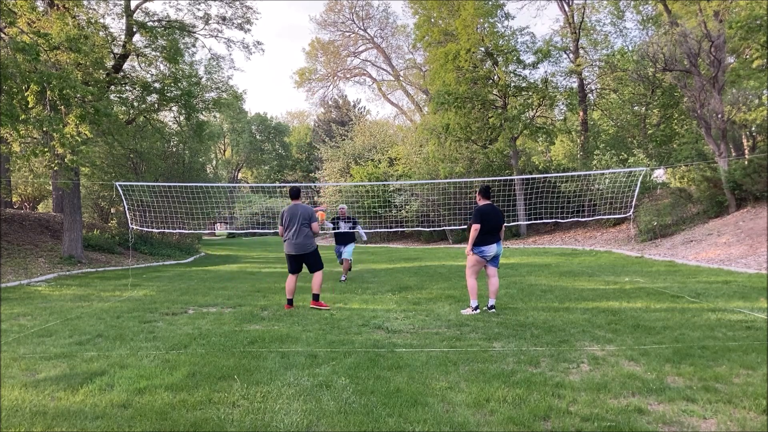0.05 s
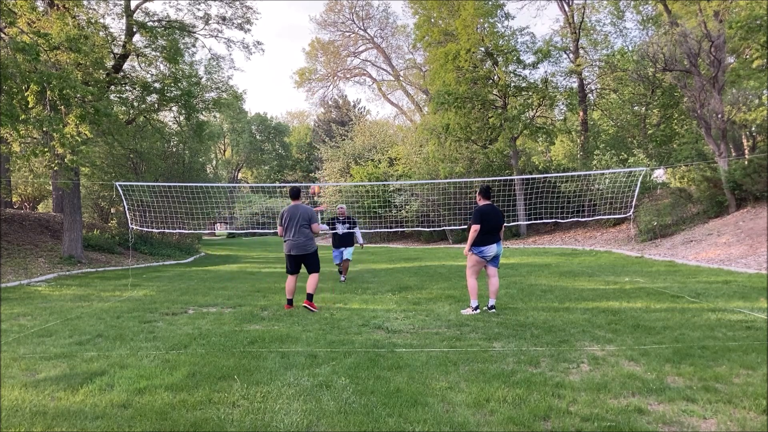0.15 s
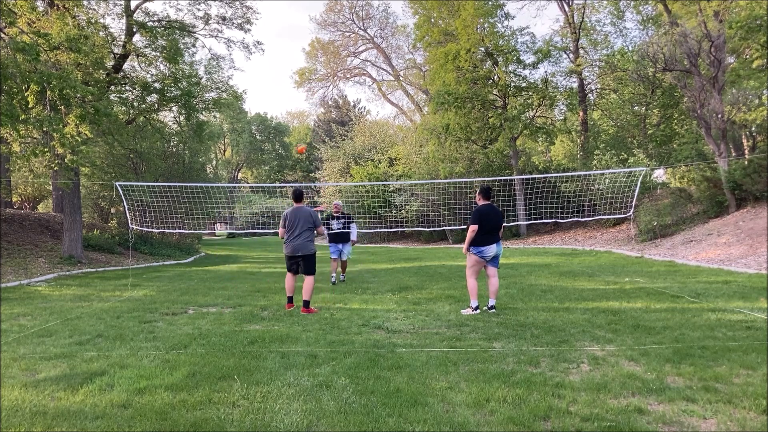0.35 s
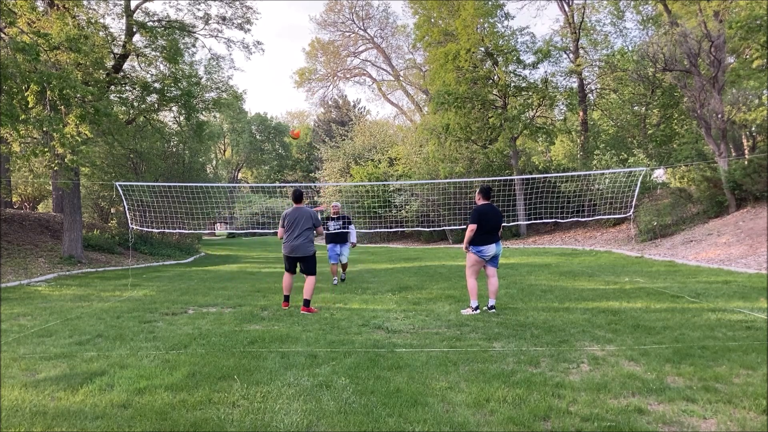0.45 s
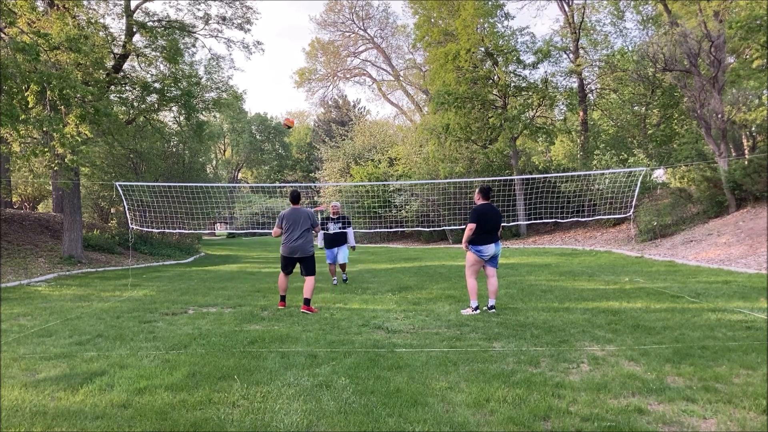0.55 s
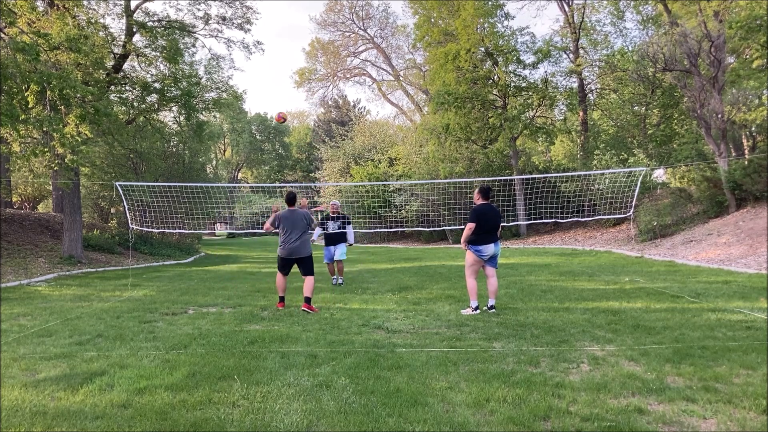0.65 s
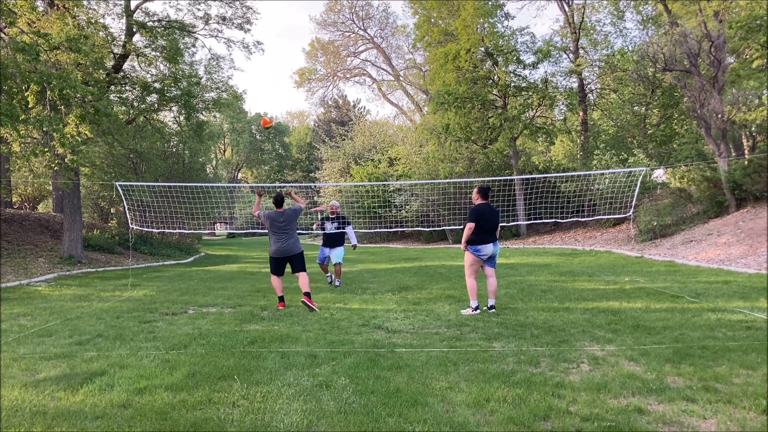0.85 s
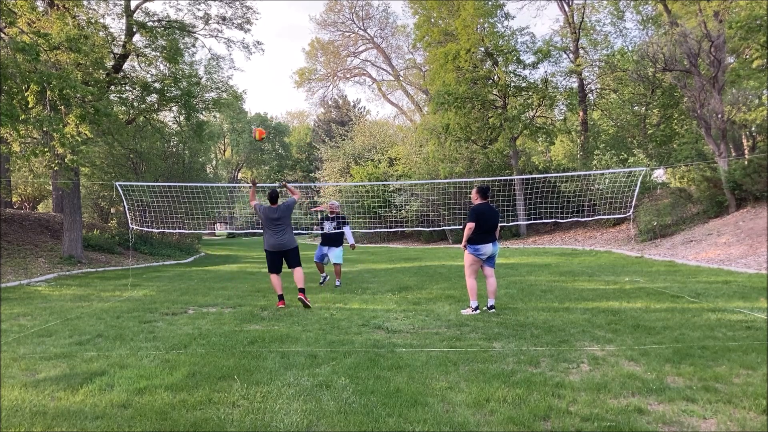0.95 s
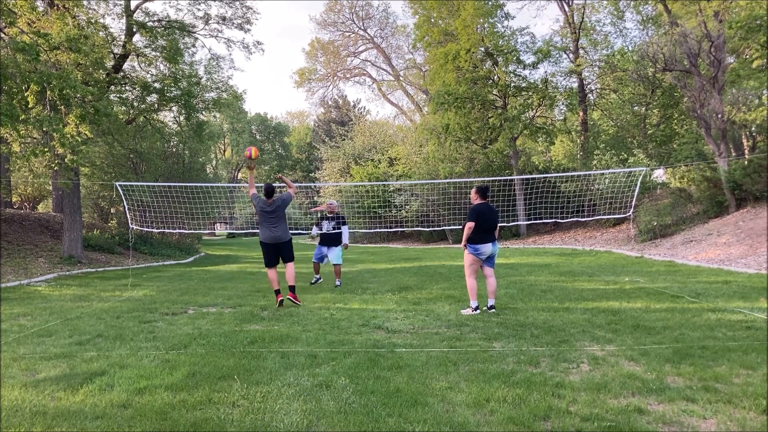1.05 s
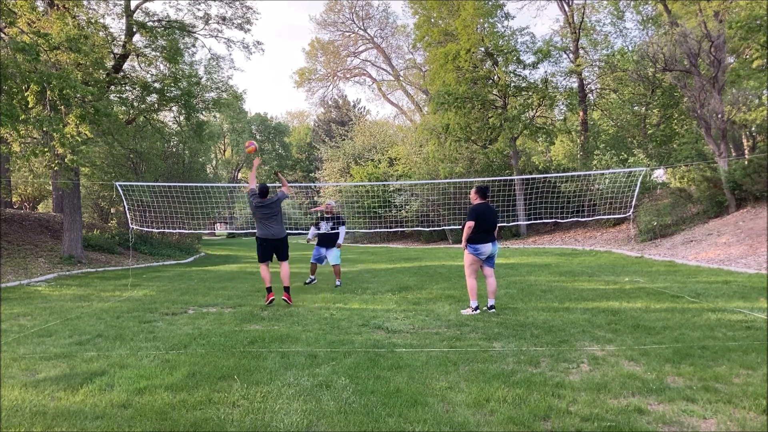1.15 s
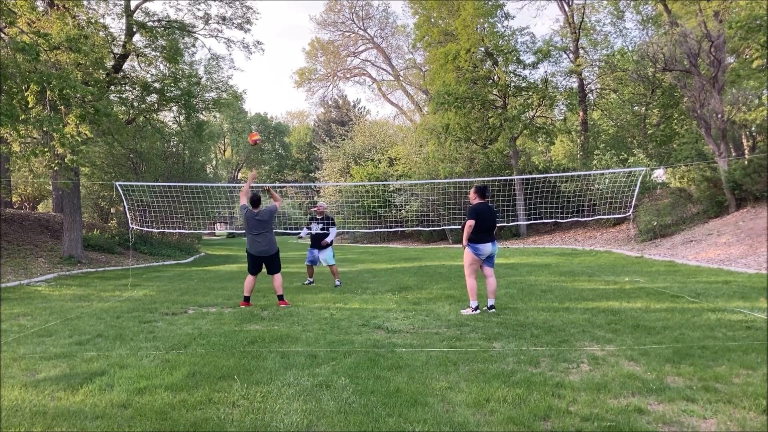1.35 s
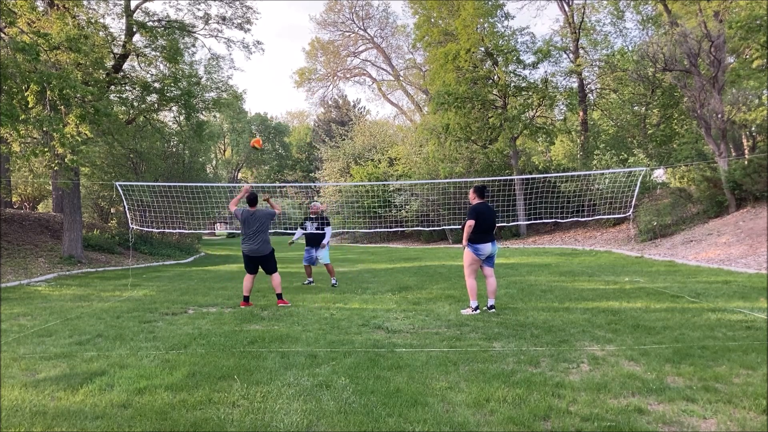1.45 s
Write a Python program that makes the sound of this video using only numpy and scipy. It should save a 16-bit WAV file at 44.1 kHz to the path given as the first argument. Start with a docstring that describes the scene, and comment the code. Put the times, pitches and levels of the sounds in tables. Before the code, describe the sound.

Two volleyball hits on an open lawn, picked up in stereo from a few metres back: a loud cracking smack with woody outdoor echo, then a duller, quieter double-handed tap, and barely audible steps on grass.

```python
"""Faint hiss over far traffic rumble, then two volleyball blows on a lawn ringed by trees and an earth bank.
Each blow: quick skin contacts (noise cracks, resonators ringing) and a deep thump of falling pitch.
Echoes follow: scatter from the trees (band noise), a noise swell from the bank, dulled thump copies.
Two soft footfalls (noise puffs) come last."""
import sys
import numpy as np
from scipy import signal
from scipy.fft import rfft, irfft
from scipy.io import wavfile

SR = 44100
rng = np.random.default_rng(int(sys.argv[2]) if len(sys.argv) > 2 else 0)


def voltage_ratio(level):
    """Linear amplitude factor for a level in decibels (scalar or array-like)."""
    return 10 ** (np.asarray(level, float) / 20)


def waveform_to_disk(signal):
    """Save audio, clipped to [-1, 1], as 16-bit WAV at the path in sys.argv[1]."""
    frames = np.transpose(np.atleast_2d(signal))
    scaled = np.clip(frames, -1, 1) * 32767
    samples = np.round(scaled).astype(np.int16)
    wavfile.write(sys.argv[1], SR, samples)


N = 66150  # 1.5 s

# Spectrum levels are relative: the noise is scaled to rms near 1 before its own level applies.
# background air: [f/Hz, level/dB per Hz]
AIR_SPECTRUM = [(20, -50.5), (41, -9), (65, 0), (125, -10.5), (250, -27.5), (700, -28.5), (1200, -37),
                (3000, -45.5), (8000, -50), (12000, -49), (14500, -60), (17000, -65.5)]
# background air: [f/Hz, left-right likeness -1..1]
AIR_LIKENESS = [(60, 0.95), (180, 0.36), (550, -0.23), (1650, -0.048), (4970, -0.72), (15000, 0.73)]
AIR_LEVEL_DB, AIR_DRIFT_DB = -57.5, 0.6

# blows: [t/s, thump level/dB, thump turns, bank echo delay/s, bank echo peak/dB]
BLOWS = [(.205, -13.5, 1.67, 0.024, -43), (1.2205, -21, 1.3, 0.027, -53)]
# skin contacts, one list per blow: [t/s, crack level/dB, ring drive/dB]
CONTACTS = [
    [(.2053, -57, -64), (.2060, -9.5, -20), (.2067, -57, -10.5), (.2085, -21, -75), (.2094, -31, -25)],
    [(1.2196, -30, -30.5), (1.2203, -24, -35.5), (1.2214, -35.5, -25.5), (1.2223, -56.5, -24.5),
     (1.2255, -55.5, -34), (1.2272, -54.5, -32.5), (1.2305, -58.5, -34.5)],
]
# crack colour, one list per blow: [f/Hz, level/dB per Hz]
CRACK_SPECTRA = [
    [(300, -16.5), (1500, -10.5), (3000, -3.5), (5100, 2), (6500, -2), (9000, -1.5), (11500, -2.5),
     (13600, -6.5), (15500, -3), (17500, -25)],
    [(300, -12), (1500, 16), (3000, -41), (5000, -48), (7200, 0.5), (9000, 8.5), (11500, 3.5), (13600, -19),
     (15500, -3), (17500, -30)],
]
CRACK_T60_S = 0.0041
# ball shell modes: [f/Hz, t60/s, level in first blow/dB, level in second blow/dB]
SHELL_MODES = [(1197, 0.012, -4.5, -6.5), (918, .008, -0.5, -8), (1810, .007, -19, -6.5),
               (2410, .007, -12.5, -11), (630, 0.0092, -29.5, -5), (428, 0.017, -27, 1)]
# ring band per blow, hard fist then soft fingers: [low cut/Hz, high cut/Hz]
RING_BANDS_HZ = [(635, 3500), (294.7, 2600)]
# thump times count from the blow; spread is in ln(time)
THUMP_CREST_S, THUMP_PEAK_S, THUMP_SPREAD_LN = 0.0156, 0.012, 0.5
# left-right balance of a blow: [f/Hz, left minus right/dB]
BLOW_BALANCE = [(40, -2), (150, -3.45), (400, 1.5), (1200, 4), (2500, 1), (16000, 0.5)]
# phase lead of the left channel for a blow: [f/Hz, lead/rad]
LEFT_LEAD = [(1900, 0), (2400, .5), (3100, 1.6), (5700, 1.7), (8350, -2.3), (9560, -3.7), (11500, -5.6),
             (13300, -9.1), (16700, -12.3)]

# tree scatter, one list per blow: [f/Hz, level/dB per Hz]
TREE_SPECTRA = [
    [(40, -17.5), (110, -1.5), (250, -21), (450, -25), (1000, -17), (2900, -26.5), (7400, -26),
     (11000, -26.5), (15500, -42.5), (17000, -53.5)],
    [(40, -18), (110, 0.5), (250, -11.5), (480, -14), (900, -13.5), (1600, -19.5), (3500, -26),
     (4400, -32.5), (8000, -34), (11900, -30), (15800, -68), (17000, -55)],
]
# tree scatter level per blow: [level/dB]
TREE_LEVELS_DB = [-43.5, -51.5]
# tree scatter decay before the per-blow factor: [f/Hz, t60/s]
TREE_T60 = [(60, .6), (120, 0.93), (300, 0.28), (1000, 0.85), (2000, 0.61), (3500, .65), (6000, .45),
            (8000, .33), (11000, 0.31), (16000, 0.22)]
# factor on the tree t60 per blow: [factor]
TREE_T60_FACTORS = [1.036, 0.71]
# tree scatter: [f/Hz, left-right likeness -1..1]
TREE_LIKENESS = [(60, 0.83), (180, 0.91), (550, 0.12), (1650, -0.28), (4970, 0.39), (15000, -0.25)]
# swell added by the far tree line, per blow: [t after blow/s, width/s, gain/dB]
FAR_TREES = [(.19, 0.13, 0.5), (.2, 0.042, 5.5)]
TREE_RISE_S, TREE_DRIFT_DB = 0.012, 0.7

# bank echo colour: [f/Hz, level/dB per Hz]
BANK_SPECTRUM = [(250, -16.5), (450, -6), (1000, -2.5), (2000, -7.5), (3500, 2), (4600, -2), (6000, -9),
                 (8000, -10), (12000, -17), (16000, -24.5)]
# time from echo onset to its peak, per blow: [t/s]
BANK_RISE_S = [0.0036, 0.0071]
# thump returns from banks and trunks, one list per blow: [t after blow/s, level re thump/dB]
THUMP_RETURNS = [
    [(.026, -16), (.108, -26), (.15, -28.5)],
    [(.03, -16), (.068, -22.5)],
]
RETURN_CUT_HZ = 160

# soft footfalls on grass: [t/s, level/dB, length/s]
STEPS = [(1.413, -66.5, 0.017), (1.454, -62.5, 0.039)]
# footfall colour: [f/Hz, level/dB per Hz]
STEP_SPECTRUM = [(80, 5), (300, 17.5), (900, 9.5), (2500, -21), (8000, -26.5), (12000, -40), (14000, -40)]

# fixed treble notches over the whole sound: [f/Hz, width/Hz, gain/dB]
TREBLE_DIPS = [(9230, 1700, -21), (13700, 760, -25)]
LOW_CUT_HZ, HIGH_STOP_HZ = 51, 17100


def rms_one(x):
    """Scale to rms 1."""
    return x / np.sqrt(np.mean(x ** 2) + 1e-20)


def at_hz(points, hz):
    """Read a table on a log-frequency axis."""
    p = np.array(points, float)
    return np.interp(np.log(hz), np.log(np.maximum(p[:, 0], 1)), p[:, 1])


def drift(rate_hz):
    """Slow random curve of rms near 1: low-passed noise, one point per 40 samples."""
    pole = np.exp(-2 * np.pi * rate_hz * 40 / SR)
    white = rng.standard_normal(N // 40 + 2002)
    slow = signal.lfilter([1], [1, -2 * pole, pole ** 2], white)[2000:]
    return np.interp(np.arange(N) / 40, np.arange(len(slow)), rms_one(slow))


def bands(spectrum, likeness, drift_db, shape):
    """Third-octave stereo noise bands, total rms near 1 before each is multiplied by shape(hz)."""
    edges = 22 * 2 ** np.arange(0, 9.8, 1 / 3)
    mids = np.sqrt(edges[1:] * edges[:-1])
    gains = voltage_ratio(at_hz(spectrum, mids))
    gains = gains / np.sqrt(np.sum(gains ** 2 * np.diff(edges)) * 2 / SR)
    white = rng.standard_normal((2, 2, N + 8000))
    common_drift = drift(1.7)
    out = 0
    for k, hz in enumerate(mids):
        sos = signal.butter(2, edges[k:k + 2], "band", fs=SR, output="sos")
        mid, side = signal.sosfilt(sos, white[k % 2])[:, 8000:]  # filter settled
        alike = np.clip(at_hz(likeness, hz), -1, 1)
        gain = gains[k] * shape(hz) * voltage_ratio(drift_db * (1.3 * common_drift + drift(9.5)))
        stereo = np.sqrt(1 + alike) * mid + np.sqrt(1 - alike) * side * [[1], [-1]]
        out = out + gain * stereo / np.sqrt(2)
    return out


def coloured(spectrum):
    """Mono noise of the given spectrum, rms 1; 12 dB/octave fall below the first point."""
    hz = np.maximum(np.arange(N // 2 + 1) * SR / N, 1)
    low_fall = np.minimum(hz / spectrum[0][0], 1) ** 2
    white = rfft(rng.standard_normal(N))
    return rms_one(irfft(white * voltage_ratio(at_hz(spectrum, hz)) * low_fall, N))


def air():
    """Far traffic rumble and faint hiss: steady noise whose bands drift in level."""
    return voltage_ratio(AIR_LEVEL_DB) * bands(AIR_SPECTRUM, AIR_LIKENESS, AIR_DRIFT_DB, lambda hz: 1)


def slap(k):
    """Each skin contact fires a decaying noise crack and drives the shell's damped modes."""
    crack_hits, ring_hits = np.zeros(N) + 1e-18, np.zeros(N) + 1e-18
    for s, crack_db, ring_db in CONTACTS[k]:
        crack_hits[int(s * SR)] = voltage_ratio(crack_db)
        ring_hits[int(s * SR)] = -voltage_ratio(ring_db)
    crack_envelope = signal.lfilter([1], [1, -voltage_ratio(-60 / (CRACK_T60_S * SR))], crack_hits)
    crack = coloured(CRACK_SPECTRA[k]) * crack_envelope
    ring = 0
    for hz, t60_s, *levels_db in SHELL_MODES:
        r, w = voltage_ratio(-60 / (t60_s * SR)), 2 * np.pi * hz / SR
        drive = [0, voltage_ratio(levels_db[k]) * np.sin(w)]
        ring = ring + signal.lfilter(drive, [1, -2 * r * np.cos(w), r * r], ring_hits)
    band = signal.butter(2, RING_BANDS_HZ[k], "band", fs=SR, output="sos")
    return crack + signal.sosfilt(band, ring)


def thump(s, level_db, turns):
    """Deep thump: a swell of falling pitch, turns / time since the blow."""
    log_t = np.log(np.maximum(np.arange(N) / SR - s, 1e-5))
    swell = np.exp(-.5 * ((log_t - np.log(THUMP_PEAK_S)) / THUMP_SPREAD_LN) ** 2)
    return voltage_ratio(level_db) * swell * np.cos(2 * np.pi * turns * (log_t - np.log(THUMP_CREST_S)))


def place(x):
    """Mono to stereo: balance varies with frequency, left treble is phase-shifted."""
    hz = np.maximum(np.arange(N // 2 + 1) * SR / N, 1)
    tilt = voltage_ratio(at_hz(BLOW_BALANCE, hz) / 2)
    lead = np.exp(1j * np.interp(hz, *np.transpose(LEFT_LEAD)))
    return irfft(rfft(x) * np.array([tilt * lead, 1 / tilt]), N)


def tree_scatter(k, s):
    """Scatter swells just after the blow and dies band by band; the far tree line adds a swell."""
    t = np.maximum(np.arange(N) / SR - s, 0)
    far_s, width_s, far_db = FAR_TREES[k]
    far_swell = voltage_ratio(far_db * np.exp(-.5 * ((t - far_s) / width_s) ** 2))
    rise = (1 - np.exp(-t / TREE_RISE_S)) ** 2

    def decay(hz):
        """60 dB per t60, gain 1 at 0.08 s."""
        return voltage_ratio(-60 * (t - .08) / (TREE_T60_FACTORS[k] * at_hz(TREE_T60, hz)))

    noise = bands(TREE_SPECTRA[k], TREE_LIKENESS, TREE_DRIFT_DB, decay)
    return voltage_ratio(TREE_LEVELS_DB[k]) * rise * far_swell * noise


def bank_echo(s, level_db, rise_s):
    """The rough bank returns the slap as a short noise swell, independent left and right."""
    t = np.maximum(np.arange(N) / SR - s, 0) / rise_s
    noise = np.array([coloured(BANK_SPECTRUM), coloured(BANK_SPECTRUM)])
    return voltage_ratio(level_db) * t * np.exp(1 - t) * noise


def thump_returns(k, s, level_db, turns):
    """Banks and trunks return weaker, low-passed thumps."""
    returns = sum(thump(s + after_s, level_db + loss_db, turns) for after_s, loss_db in THUMP_RETURNS[k])
    return signal.sosfilt(signal.butter(2, RETURN_CUT_HZ, fs=SR, output="sos"), returns)


def steps():
    """Footfalls on grass: Gaussian puffs of noise under a shoe, equal in both channels."""
    t = np.arange(N) / SR
    puffs = sum(voltage_ratio(db) * np.exp(-.5 * ((t - s) / (length_s / 2)) ** 2) for s, db, length_s in STEPS)
    return coloured(STEP_SPECTRUM) * puffs


def scene():
    """Air, two blows with their echoes, footfalls."""
    out = air()
    for k, (s, thump_db, turns, echo_delay_s, echo_db) in enumerate(BLOWS):
        blow = slap(k) + thump(s, thump_db, turns)
        out = out + place(blow + thump_returns(k, s, thump_db, turns))
        out = out + tree_scatter(k, s)
        out = out + bank_echo(s + echo_delay_s, echo_db, BANK_RISE_S[k])
    return out + steps()


def roll_off(x):
    """The treble ends steeply here."""
    return signal.sosfilt(signal.butter(12, 17150, fs=SR, output="sos"), x)


def record(dry):
    """Fixed treble notches, then low and high cut."""
    for hz, width_hz, dip_db in TREBLE_DIPS:
        w, wide = 2 * np.pi * hz / SR, np.pi * width_hz / SR
        zeros = [1 + wide * voltage_ratio(dip_db), -2 * np.cos(w), 1 - wide * voltage_ratio(dip_db)]
        poles = [1 + wide, -2 * np.cos(w), 1 - wide]
        dry = signal.lfilter(zeros, poles, dry)
    low_cut = signal.butter(2, LOW_CUT_HZ, "high", fs=SR, output="sos")
    high_cut = signal.cheby2(12, 70, HIGH_STOP_HZ, fs=SR, output="sos")  # 70 dB down from HIGH_STOP_HZ
    mix = signal.sosfilt(high_cut, signal.sosfilt(low_cut, dry))
    return roll_off(mix)


dry = scene()
out = record(dry)
waveform_to_disk(out)
```